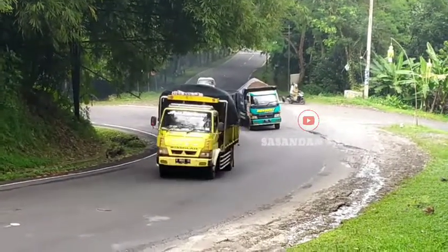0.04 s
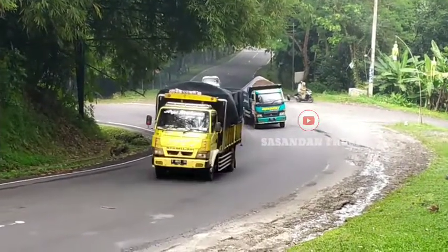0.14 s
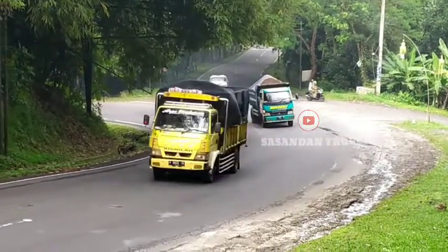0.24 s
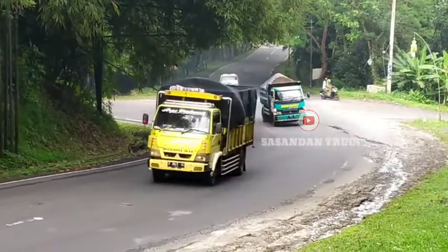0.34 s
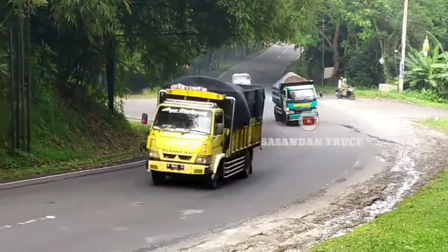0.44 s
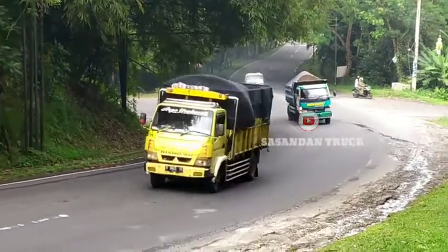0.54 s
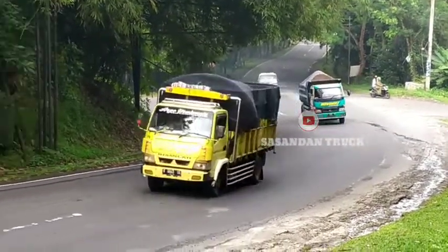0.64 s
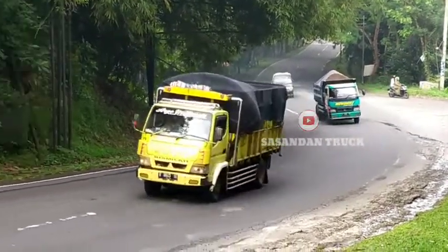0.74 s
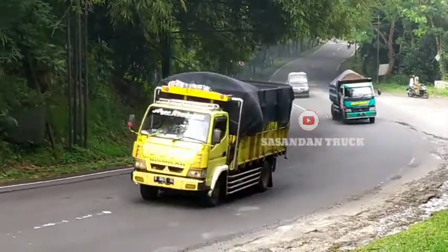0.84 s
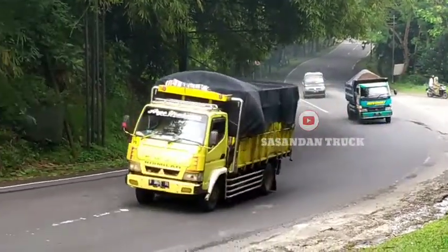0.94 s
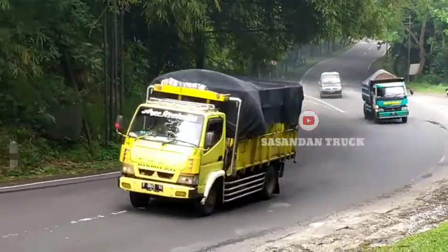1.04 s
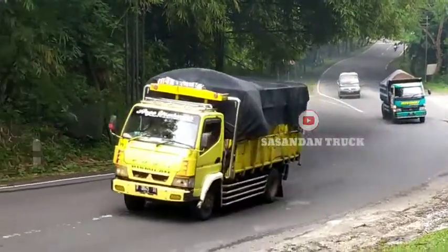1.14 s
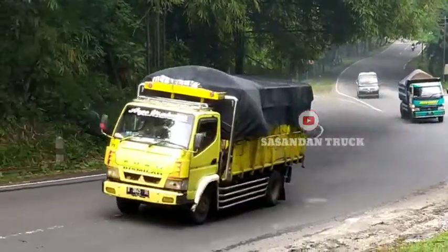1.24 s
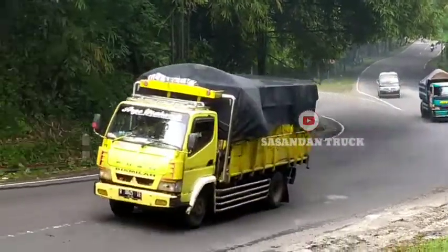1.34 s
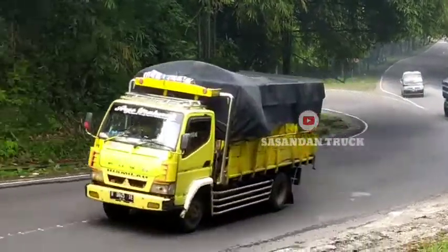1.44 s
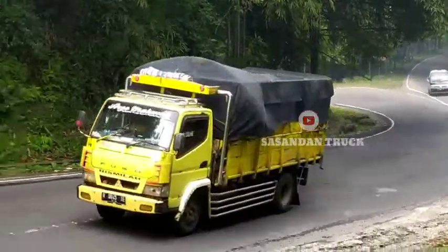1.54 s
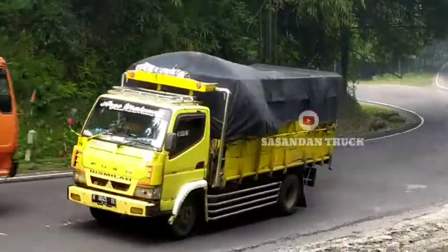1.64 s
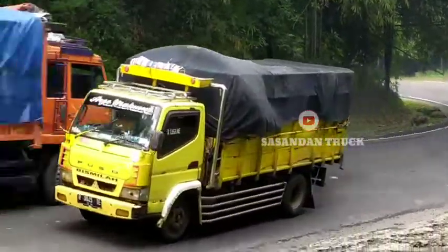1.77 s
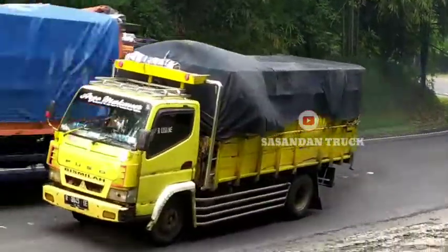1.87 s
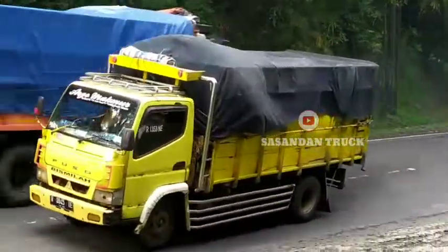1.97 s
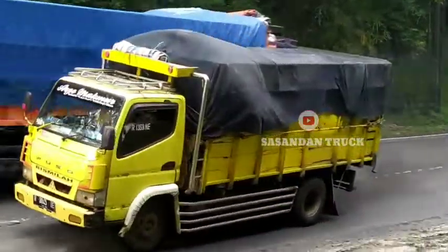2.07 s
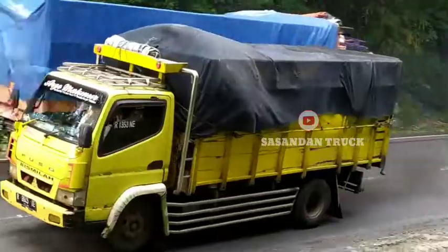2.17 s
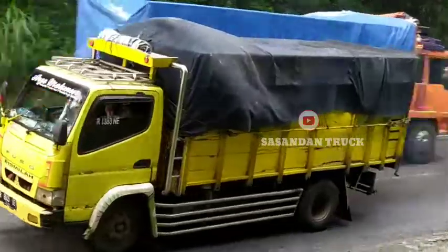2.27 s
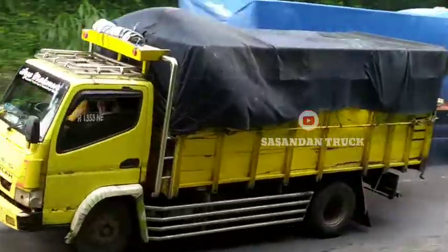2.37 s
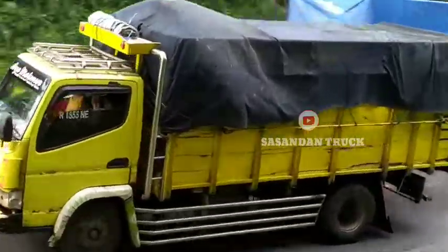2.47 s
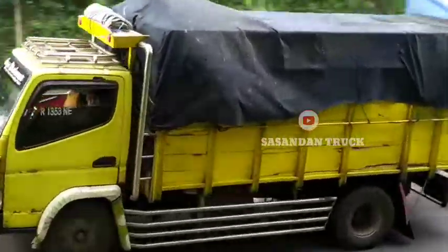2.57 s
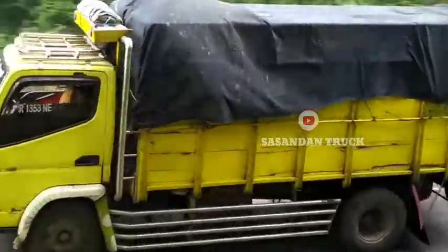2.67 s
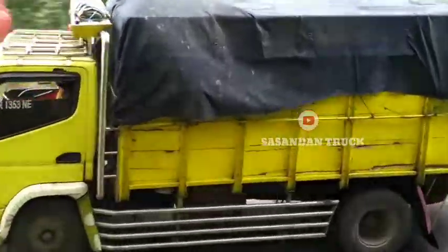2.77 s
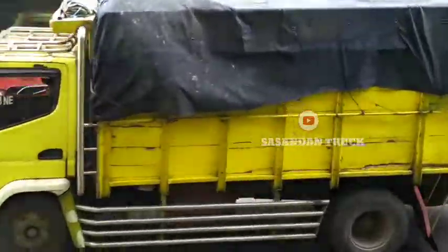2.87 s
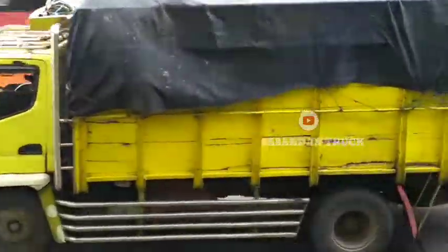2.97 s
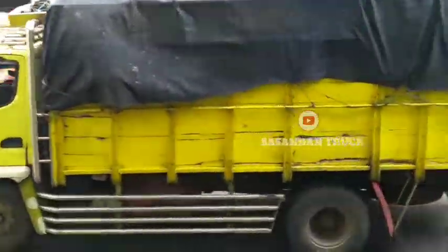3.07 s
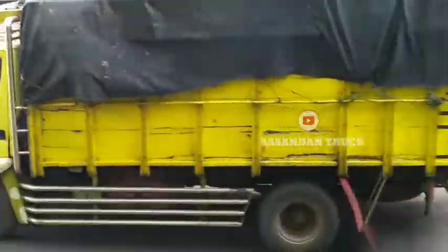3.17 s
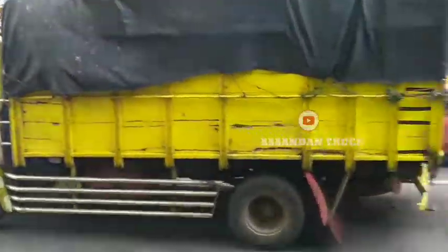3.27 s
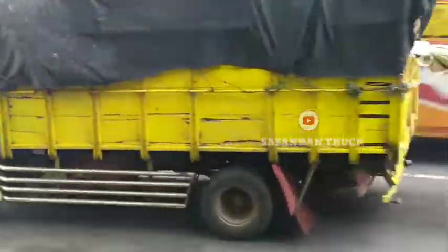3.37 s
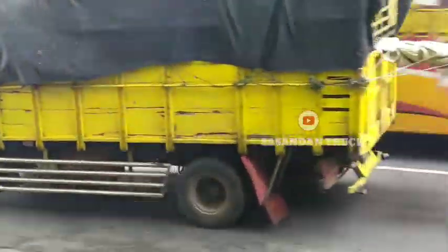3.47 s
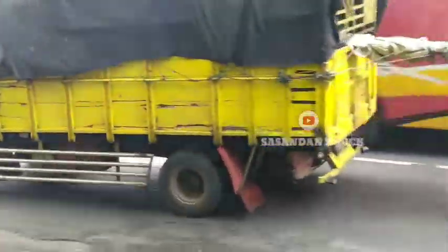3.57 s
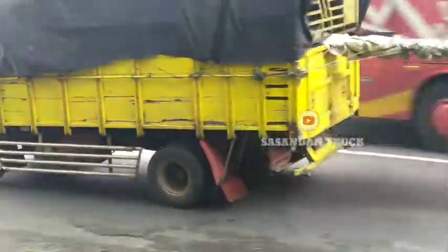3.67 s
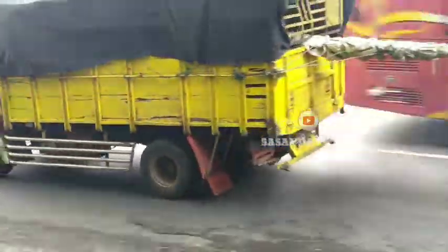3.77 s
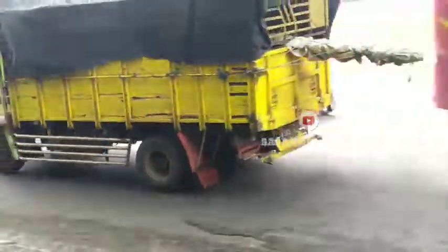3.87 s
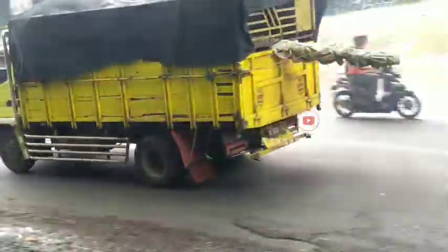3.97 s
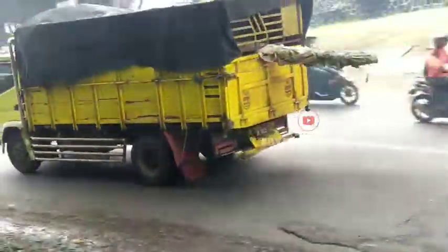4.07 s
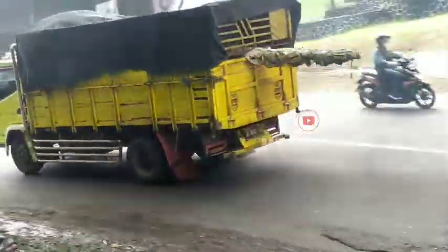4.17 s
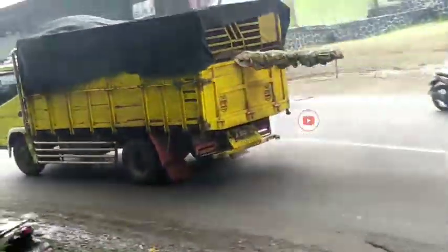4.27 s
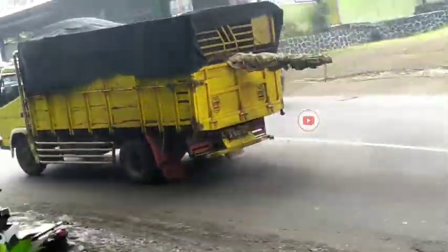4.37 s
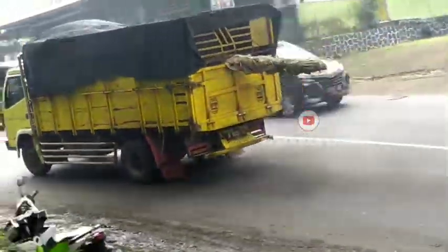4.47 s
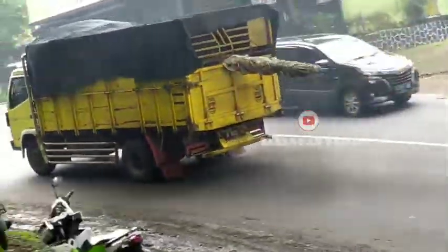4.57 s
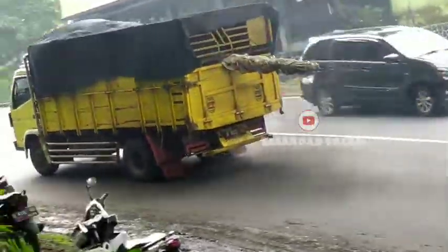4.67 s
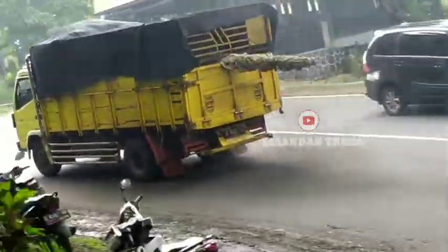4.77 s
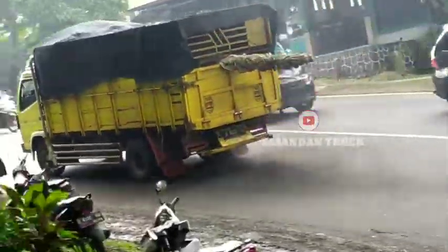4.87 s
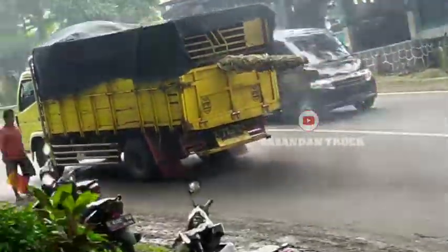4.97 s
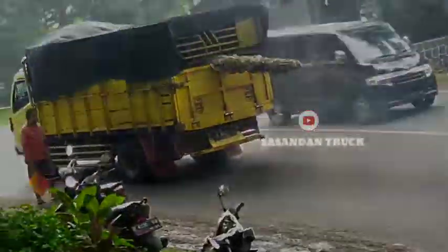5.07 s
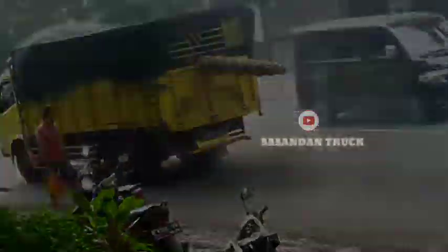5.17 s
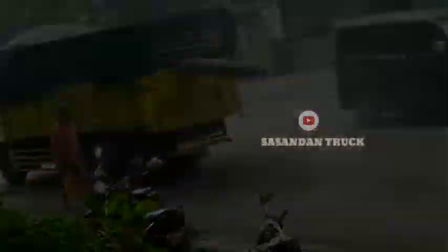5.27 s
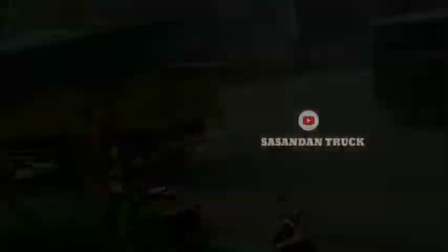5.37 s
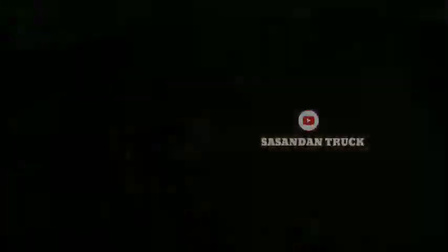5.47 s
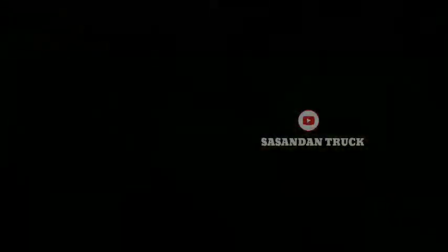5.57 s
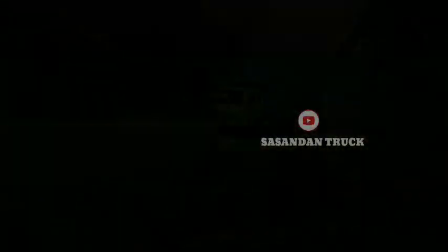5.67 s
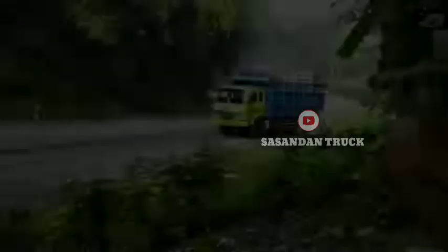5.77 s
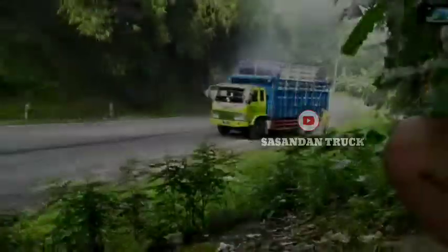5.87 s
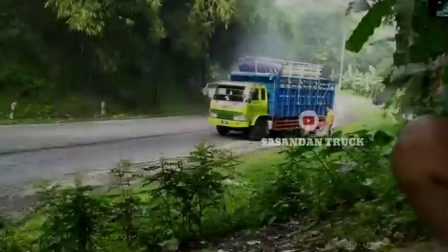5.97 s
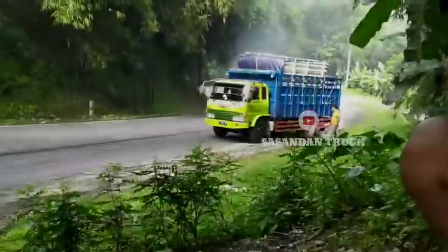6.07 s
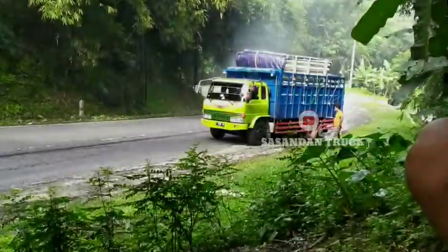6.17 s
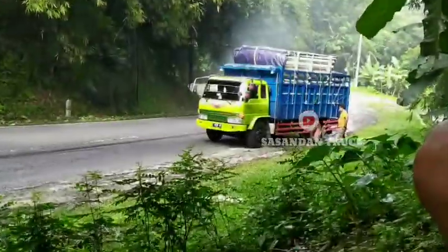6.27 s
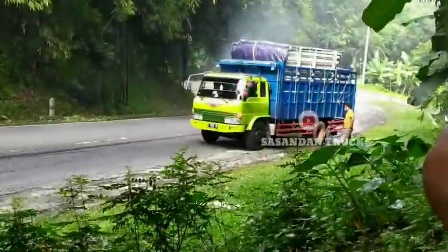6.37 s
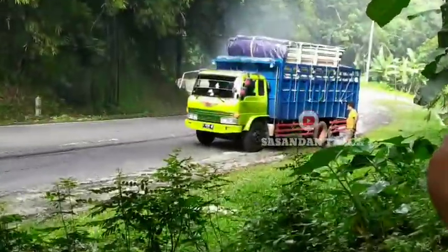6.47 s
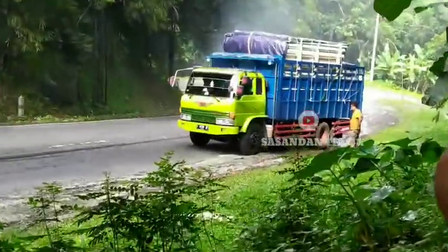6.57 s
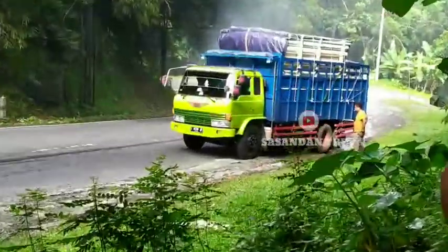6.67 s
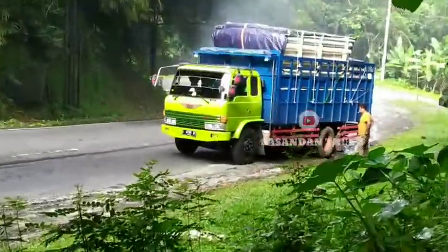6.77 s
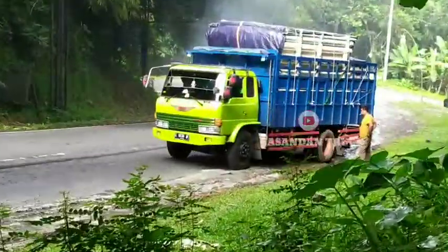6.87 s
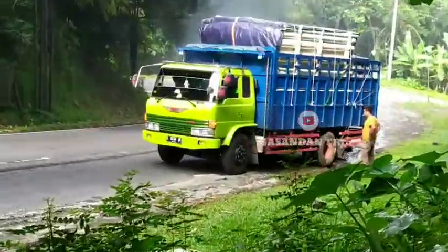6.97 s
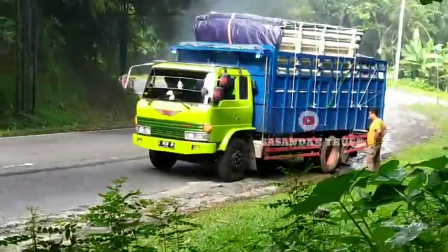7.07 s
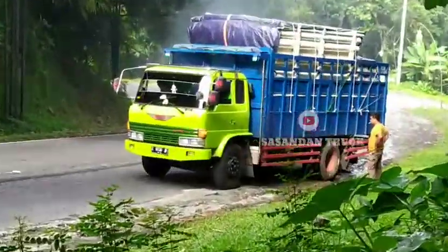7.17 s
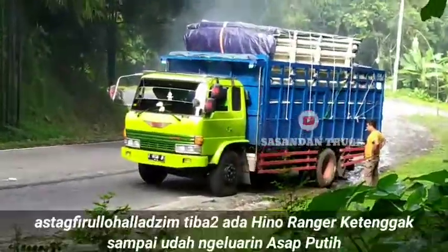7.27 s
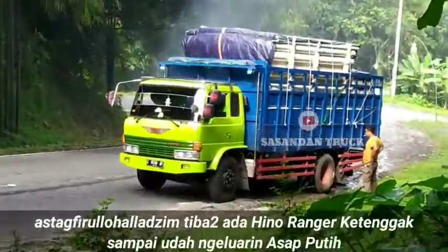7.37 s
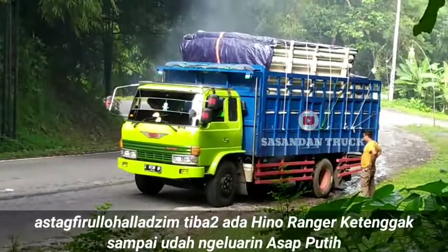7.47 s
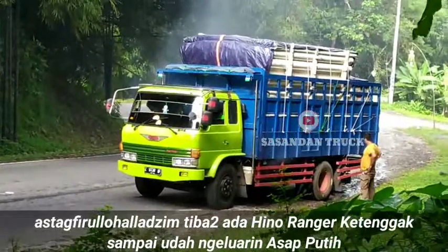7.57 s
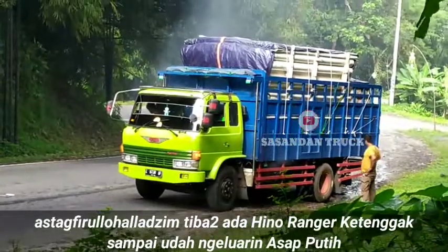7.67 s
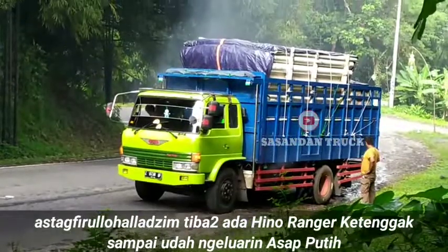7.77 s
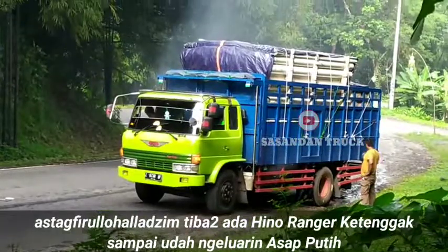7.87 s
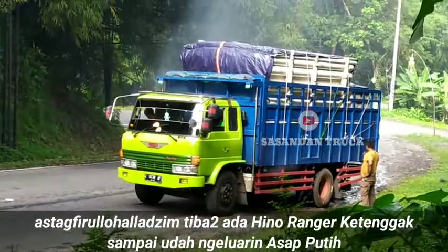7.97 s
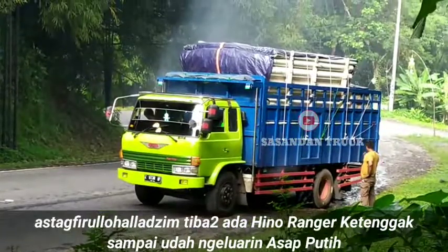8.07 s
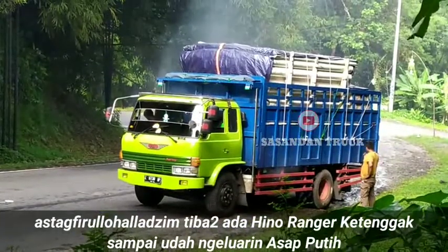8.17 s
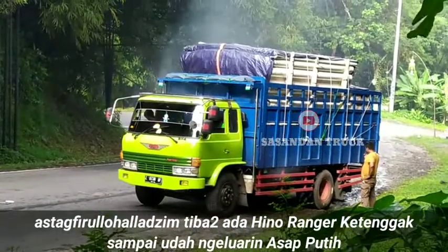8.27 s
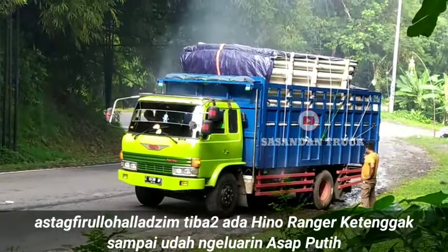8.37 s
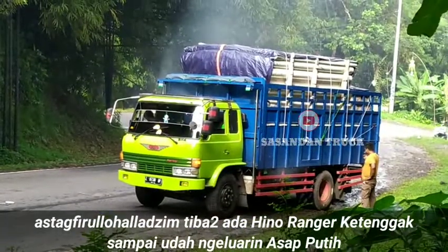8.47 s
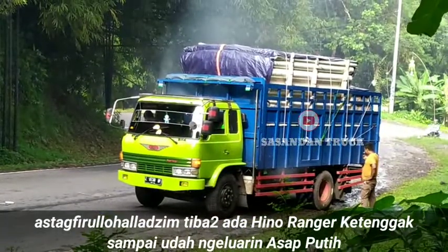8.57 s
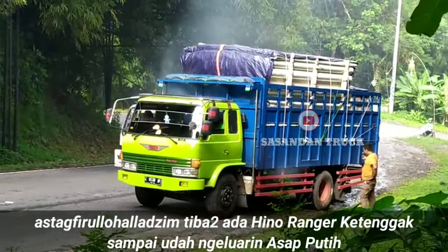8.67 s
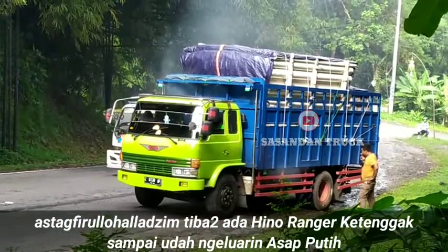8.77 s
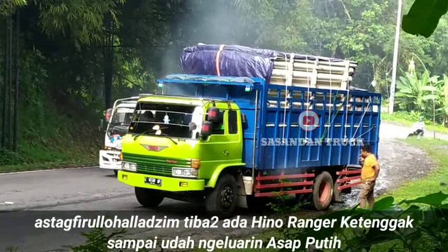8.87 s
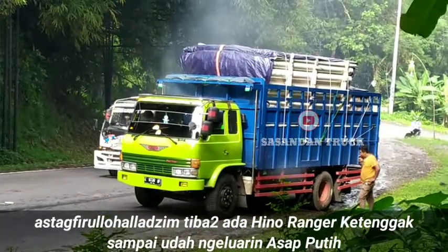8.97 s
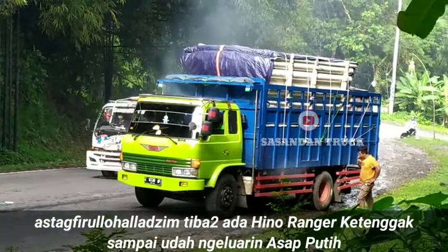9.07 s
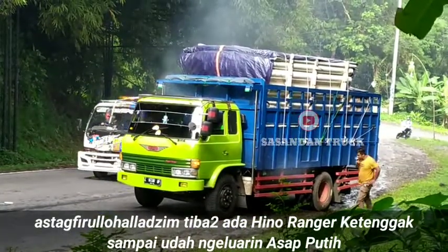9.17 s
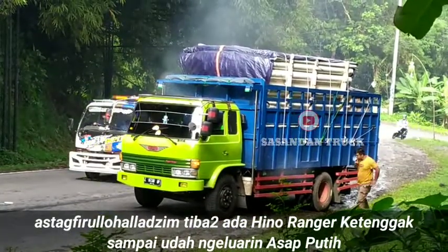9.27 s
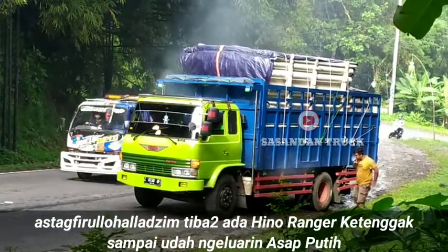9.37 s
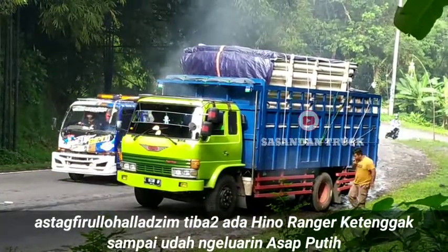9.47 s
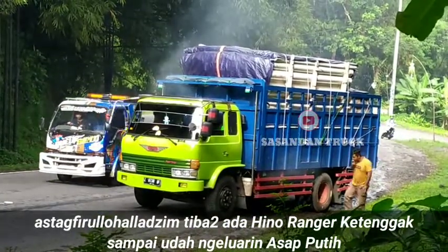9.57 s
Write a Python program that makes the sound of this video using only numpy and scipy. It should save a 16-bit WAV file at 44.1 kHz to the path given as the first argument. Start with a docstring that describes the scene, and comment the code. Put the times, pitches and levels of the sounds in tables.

```python
"""By an uphill road, a loaded four-cylinder diesel truck labours past a pair of microphone ports. Each firing
thumps in the exhaust as harmonics and silencer pops, and its puff blows a shrill tailpipe whistle. Shaped noise
gives engine clatter and the roar of tyres and engine; traffic hums and hiss spurts cross it. Then the scene
changes: a second truck idles further off as pulsed noise under a swelling hum, and a third draws nearer with a
growing gear whine, under bands of hiss and thin tones gliding high above."""
import sys
import numpy as np
from scipy import signal
from scipy.fft import rfft, irfft
from scipy.io import wavfile
from scipy.ndimage import uniform_filter1d, minimum_filter1d

SR = 44100
rng = np.random.default_rng(int(sys.argv[2]) if len(sys.argv) > 2 else 0)


def waveform_to_disk(signal):
    """Save audio, clipped to [-1, 1], as 16-bit WAV at the path in sys.argv[1]."""
    frames = np.transpose(np.atleast_2d(signal))
    scaled = np.clip(frames, -1, 1) * 32767
    samples = np.round(scaled).astype(np.int16)
    wavfile.write(sys.argv[1], SR, samples)


N = 425124
TIME = np.arange(N) / SR
BINS = np.fft.rfftfreq(N, 1 / SR)


def amp(db):
    """Level law: decibels to an amplitude factor."""
    return 10 ** (np.asarray(db) / 20)


def unit(x):
    """Normalisation: scales a signal to rms 1."""
    return x / np.sqrt(np.mean(abs(x) ** 2) + 1e-20)


def spectrum(points):
    """Log-frequency interpolation: a short spectrum spread over all frequencies."""
    hz, value = np.transpose(points)
    return np.interp(np.log(BINS + 1), np.log(hz), value)


def curve(points):
    """Linear interpolation: a short curve in time spread over all samples."""
    return np.interp(TIME, *np.transpose(points))


def bell(s, half):
    """Gaussian envelope: a smooth swell of height 1 around s."""
    return np.exp(-((TIME - s) / half) ** 2 / 2)


def ramp(s, length):
    """Sigmoid transition: a smooth step from 0 to 1 around s."""
    return .5 + .5 * np.tanh((TIME - s) / length)


def pan(db):
    """Interaural level difference: gains of the two ports for a left-right difference."""
    return amp(np.outer([.5, -.5], db))


def colour(x, points):
    """Linear filtering: shapes the noise by a spectrum, to rms 1."""
    return unit(irfft(rfft(x) * amp(spectrum(points)), N))


def wander(hz):
    """Low-passed random process: slow chance of rms 1, up to about hz changes a second."""
    size = 4096
    frequency = np.fft.rfftfreq(size, TIME[-1] / size)
    slow = irfft(rfft(rng.standard_normal(size)) / (1 + (frequency / hz) ** 4))
    return np.interp(TIME, np.linspace(0, TIME[-1], size), unit(slow))


# likeness of left and right noise: (frequency [Hz], correlation [0 to 1])
PORT_LIKENESS = [(60, .995), (150, .975), (300, .91), (550, .84), (1000, .78), (2000, .25), (8000, .05)]


def air(lag_ms):
    """Spatial coherence: turbulent noise alike at both ports in the bass, reaching the left one later."""
    a, b = rfft(rng.standard_normal((2, N)))
    same = np.clip(spectrum(PORT_LIKENESS), 0, 1)
    delay = np.exp(-2j * np.pi * BINS * lag_ms / 10 ** 3)
    left = (same * a + np.sqrt(1 - same ** 2) * b) * delay
    return irfft(np.array([left, a]), N)


def resonate(x, hz, width_hz):
    """Resonance: a steep band-pass that follows hz, to rms 1."""
    turn = np.exp(2j * np.pi * np.cumsum(hz * np.ones(N)) / SR)
    r = np.exp(-np.pi * width_hz / SR)
    # shift the band to zero frequency, smooth it there, then shift it back
    smooth = signal.lfilter([(1 - r) ** 2], [1, -2 * r, r * r], x / turn)
    return unit((turn * smooth).real)


def swells(rows, flow):
    """Band-limited noise: narrow or wide bands that rise and die away."""
    return sum(amp(db) * bell(s, half) * resonate(flow, hz, width)
               for s, half, hz, width, db in rows)


def tone(turns, flutter, flutter_hz):
    """Random modulation: an engine order whose strength and phase flutter."""
    angle = 2 * np.pi * (turns + rng.random())
    in_phase = (1 + flutter * wander(flutter_hz)) * np.cos(angle)
    return unit(in_phase + flutter * wander(flutter_hz) * np.sin(angle))


# strength of each cylinder in firing order [dB]
CYLINDER_DB = [-3.5, -6.5, -4, -5.5]


def puffs(turns, depth, length, uneven_db):
    """Pulsating flow: one gas puff per firing, quick to rise and slower to die, over a steady flow."""
    count = np.floor(turns).astype(int)
    chance = rng.standard_normal(N // 100)[count]
    size = amp(np.take(CYLINDER_DB, count, mode="wrap") + uneven_db * chance)
    age = (turns % 1) / length  # length is a share of the firing interval
    return unit(1 + depth * size * age * np.exp(1 - age))


# the pass: time of the closest point, distance, speed; and the speed of sound
CLOSEST_S, DISTANCE_M, SPEED_M_PER_S, SOUND_M_PER_S = 3.4, 7.794, 6.0, 343


def nearness(s):
    """Pass-by geometry: closest over present distance, for a part of the truck that is nearest at s."""
    return DISTANCE_M / np.hypot(DISTANCE_M, SPEED_M_PER_S * (TIME - s))


def passing(s, db, fall):
    """Spreading and directivity: gain of a passing source; a sideways beam falls faster with distance."""
    return amp(db) * nearness(s) ** fall


def doppler():
    """Doppler effect: pitch factor above 1 on the approach, below 1 going away."""
    receding = SPEED_M_PER_S ** 2 * (TIME - CLOSEST_S) * nearness(CLOSEST_S) / DISTANCE_M
    return 1 / (1 + receding / SOUND_M_PER_S)


# the climb drags the firing rate down until the engine holds
START_HZ, SAG_HZ_PER_S, LABOUR_HZ = 66.0, 3.22, 53.5


def firing_rate():
    """Engine loading: firings per second, sagging under the load, then steady."""
    return np.maximum(START_HZ - SAG_HZ_PER_S * TIME, LABOUR_HZ)


# how far each cylinder fires off the even beat [share of a firing interval]
CYLINDER_STAGGER = [0, .035, -.02, .015]
# pass of the pops: loudest [s], level [dB], fall with distance [exponent]
POP_PASS = (3.6, -31, 1.14)
# colour of the silencer: (frequency [Hz], level per Hz [dB])
SILENCER_SPECTRUM = [(60, -25), (110, -2), (165, 0.5), (260, -7), (340, 1.5), (420, -3), (500, -9),
                     (620, -23), (1200, -60)]


def chug(turns):
    """Impulse response: firing pops ring the silencer; unequal cylinders fill gaps between engine orders."""
    at = np.flatnonzero(np.diff(np.floor(turns)))
    order = np.arange(len(at))
    size, late = rng.standard_normal((len(at), 2)).T
    offset = np.take(CYLINDER_STAGGER, order, mode="wrap") + .004 * late
    at = at + offset * SR / LABOUR_HZ
    pops = np.zeros(N)
    pops[np.clip(at.astype(int), 0, N - 1)] = amp(np.take(CYLINDER_DB, order, mode="wrap") + size)
    return passing(*POP_PASS) * colour(pops, SILENCER_SPECTRUM)


# engine orders that ring out: (peak [s], half length [s], multiple of the firing rate, level [dB])
DRONE_ORDERS = [(.15, .25, 3.87, -40), (2.35, .22, 2, -31.5), (1.55, .35, 6.07, -37.5), (2.15, .35, 3, -35),
                (2.7, .42, 6, -33), (2.65, .25, 4, -37), (3.25, .12, 4, -33), (3.8, .8, 1.5, -32),
                (3.74, .1, 3, -27), (3.22, .22, 7.45, -30), (3.33, .12, 7, -35), (3.72, .12, 7, -35),
                (4.12, .16, 7.47, -28.5), (4.7, .3, 7.43, -37), (3.1, .22, 9, -37.5), (3.72, .1, 9, -34),
                (4.35, .14, 9, -36), (4.55, .25, 6.25, -34)]


def drone(turns):
    """Swept resonance: higher orders ring in turn, wavering, as the sagging speed crosses body resonances."""
    return sum(amp(db) * bell(s, half) * tone(k * turns + .028 * wander(4), flutter=.17, flutter_hz=8)
               for s, half, k, db in DRONE_ORDERS)


# exhaust harmonics 1, 2, 3: (loudest [s], level [dB], fall with distance [exponent])
EXHAUST_HARMONICS = [(3.06, -15, 0.99), (4.1, -25.5, 1.6), (3.55, -25.5, 2.33)]
# brief dips of one harmonic: (time [s], half length [s], harmonic, depth [dB])
HARMONIC_DIPS = [(1.07, 0.14, 1, 13.5), (1.65, 0.19, 1, 3), (2.19, 0.15, 1, 6), (3.57, 0.14, 1, 7),
                 (4.334, 0.06, 1, 6), (5.03, 0.1, 1, 3.5), (6.03, 0.13, 1, 6.5), (2.95, 0.14, 2, 18),
                 (2.85, 0.088, 3, 12), (4.32, 0.25, 3, 11)]
# flutter of the first harmonic (higher ones in proportion), and how fast
FLUTTER, FLUTTER_HZ = .05, 12


def exhaust(turns):
    """Harmonic series: the firing tone and overtones with pops and drone, the same at both ports."""
    thump = np.zeros(N)
    for k, (s, db, fall) in enumerate(EXHAUST_HARMONICS, 1):
        dip_db = sum(depth * bell(at, half)
                     for at, half, harmonic, depth in HARMONIC_DIPS if round(harmonic) == k)
        thump += passing(s, db - dip_db, fall) * tone(k * turns, k * FLUTTER, FLUTTER_HZ)
    return thump + chug(turns) + drone(turns)


# fine panel modes: their unevenness, spacing, and the time from one set facing us to the next
MODE_DEPTH_DB, MODE_SPACING_HZ, FACING_S = 2.2, 45, .8


def facets(x):
    """Modal radiation: many fine panel modes colour the noise; another set faces us as the truck moves."""
    whole, out = rfft(x), 0
    modes = np.arange(0, SR / 2, MODE_SPACING_HZ)
    for k in range(3):
        uneven = amp(MODE_DEPTH_DB * np.interp(BINS, modes, rng.standard_normal(len(modes))))
        away = (TIME / FACING_S - k) % 3 - 1  # three sets take turns
        out = out + irfft(whole * uneven, N) * np.cos(np.pi / 2 * np.minimum(away, 1))
    return unit(out)


# the roar dies away as the tailpipe swings out of line
SWING_S, ROAR_DB_PER_S = 4.5, 1.5


def leaving(db_per_s):
    """Directivity: gain that falls once the tailpipe has swung away."""
    return amp(-db_per_s * np.maximum(TIME - SWING_S, 0))


# roar from the front and from behind, and combustion clatter: (frequency [Hz], level per Hz [dB])
ROAR_FRONT, ROAR_REAR = [(25, -18), (45, 2), (85, 4.5), (270, -10.5), (380, -5), (490, -12), (690, -4),
                         (1050, -8.5), (1400, -13.5), (6000, -40)], [(25, -1.5), (90, 5.5), (200, -4), (400, -1), (560, -11.5), (750, -7),
                                       (1050, -7), (1400, -16), (6000, -64)]
CLATTER_SPECTRUM = [(300, -48), (900, -8), (1400, -3.5), (1900, 1.5), (2500, -0.5), (3500, -4.5),
                    (4200, -12.5), (5000, -7.5), (6800, -9.5), (9300, -20.5), (11000, -14), (13000, -28.5),
                    (15500, -52)]
# low boom that carries far along the road: (frequency [Hz], level per Hz [dB])
BOOM_SPECTRUM = [(90, -27), (150, 3.5), (210, 0), (280, -3.5), (350, -10), (1000, -60)]
# broad resonances of engine and body, heard as each side faces us:
# (peak [s], half length [s], centre [Hz], width [Hz], level [dB])
PANEL_BANDS = [(1.5, 1.0, 694, 170, -38.5), (3.4, 0.82, 910, 200, -34), (.5, 0.76, 2270, 450, -43),
               (2.2, .5, 2360, 330, -35.5), (3.45, .5, 1900, 300, -36.5), (4.5, .4, 2230, 160, -42)]
# left-right balance of the clatter: (time [s], left minus right [dB])
CLATTER_BALANCE = [(0, 5), (.9, -3), (3.3, -3), (4.3, -2.5)]
# pass of each layer: loudest [s], level [dB], fall with distance [exponent]
ROAR_PASS, CLATTER_PASS = (3.19, -22.5, 0.92), (3.39, -23, 1.09)
FIZZ_PASS, BOOM_PASS = (3, -29.5, 1.61), (2.3, -34.5, 0.05)
# the truck turns from showing its front to showing its tail
TURN_S, TURN_LENGTH_S = 2.78, 0.98
# the load body screens the engine once the cab has gone by
SCREEN_S, SCREEN_LENGTH_S, SCREEN_DB = 4.11, 0.13, -2.5


def engine_noise(turns):
    """Amplitude-modulated noise: roar that deepens as the tail turns to us, clatter beating with firings."""
    tail = ramp(TURN_S, TURN_LENGTH_S)
    beat = puffs(turns, depth=.55, length=.18, uneven_db=1.5)
    front = colour(facets(air(lag_ms=0.13) * beat), ROAR_FRONT)
    behind = colour(facets(air(lag_ms=0.12) * beat), ROAR_REAR)
    roar = np.sqrt(1 - tail) * front + np.sqrt(tail) * leaving(ROAR_DB_PER_S) * behind
    knock = puffs(turns, depth=.36, length=.1, uneven_db=3.5)
    clatter = colour(facets(air(lag_ms=.12) * knock), CLATTER_SPECTRUM)
    clatter = clatter * amp(.5 * wander(19.0)) * pan(curve(CLATTER_BALANCE))
    # the finest hiss carries only from close by
    fizz_points = [(2500, -33), (4100, 19.5), (5500, 3.0), (11000, 1.5), (15000, -1.5)]  # (Hz, dB)
    fizz = colour(air(lag_ms=0.17), fizz_points) * amp(1.5 * wander(14))
    screen = amp(SCREEN_DB * ramp(SCREEN_S, SCREEN_LENGTH_S))
    boom = colour(air(lag_ms=0.12) * beat, BOOM_SPECTRUM)
    noise = swells(PANEL_BANDS, air(lag_ms=0.1) * knock)
    noise = noise + passing(*BOOM_PASS) * boom
    noise = noise + passing(*ROAR_PASS) * roar
    noise = noise + screen * passing(*CLATTER_PASS) * clatter
    return noise + passing(*FIZZ_PASS) * fizz


# whistle pitch falling with the gas flow: (time [s], frequency [Hz])
FLOW_PITCH = [(0, 8900), (1.4, 8810), (2, 8720), (2.6, 8540), (3.1, 8346), (3.6, 8230), (4.15, 8060),
              (4.5, 8080), (5.6, 8030)]
# moments when it catches on a purer note: (time [s], half length [s])
PURE_CATCHES = [(1.9, 0.25), (2.55, 0.078), (3.038, 0.15), (3.582, 0.11), (4.35, 0.22)]
# sudden hard chirps: (time [s], half length [s], level [dB])
HARD_CHIRPS = [(3.5735, .0016, -8.5), (4.231, .0016, -11.5)]
# jet hiss as the pipe's mouth points at us: (peak [s], half length [s], centre [Hz], width [Hz], level [dB])
JET_HISS = [(4.9, 0.59, 10360, 1100, -41)]
# left-right balance of the whistle: (time [s], left minus right [dB])
WHISTLE_BALANCE = [(0, -6), (2.65, -10), (3, -3.5), (3.45, -3.5), (3.75, -6), (4.3, 1), (4.8, -2), (5.6, 5)]
# pass of the whistle: loudest [s], level [dB], fall with distance [exponent]
WHISTLE_PASS = (3.43, -14.5, 1.58)
# the pipe's own pitch, and the pitch scatter from puff to puff
WHISTLE_HZ, SCATTER_HZ = 7990, 60
# power share of focused tone, its fall with distance [exponent], and the strength of the purer note
FOCUS, FOCUS_FALL, CATCH_GAIN = 0.94, 0.91, .9


def whistle(turns):
    """Flow-excited resonance: puffs blow a focused tone in a breathy band, falling as the truck goes by."""
    hz = curve(FLOW_PITCH)
    focus = np.clip(FOCUS * nearness(CLOSEST_S) ** FOCUS_FALL, 0, 1)
    blow = puffs(turns + .15, depth=1.7, length=.2, uneven_db=2)
    loose = resonate(air(lag_ms=0.212), hz + SCATTER_HZ * wander(48), width_hz=400)
    locked = resonate(air(lag_ms=0.2085), hz + 45 * wander(18), width_hz=60)
    catch = sum(bell(s, half) for s, half in PURE_CATCHES)
    core = unit(loose + CATCH_GAIN * catch * locked)
    # the tone saturates in the pipe, so its strength follows the puffs
    envelope = abs(signal.hilbert(core))
    core = unit(core / np.sqrt(1 + 0.5 * envelope ** 2)) * blow
    gusts = puffs(turns + .1, depth=.7, length=.2, uneven_db=3)
    # the breath rings both at the pipe's own pitch and at that of the flow
    breathy = unit(sum(resonate(air(lag_ms=0.203) * gusts, centre, width_hz=820)
                       for centre in (hz, WHISTLE_HZ)))
    pipe = [(5500, -40), (6950, 4.5), (7400, 4.0), (8900, 3.0), (9300, -2), (10000, -28)]  # (Hz, dB)
    sound = colour(np.sqrt(focus) * core + np.sqrt(1 - focus) * breathy, pipe)
    sound = sound * amp(0.65 * wander(30) + 0.46 * wander(5.2))
    jet = swells(JET_HISS, air(lag_ms=0.19) * gusts)
    chirp_gain = sum(amp(db) * bell(s, half) for s, half, db in HARD_CHIRPS)
    chirps = chirp_gain * unit(np.sin(2 * np.pi * np.cumsum(hz) / SR))
    return (passing(*WHISTLE_PASS) * sound + chirps) * pan(curve(WHISTLE_BALANCE)) + jet


# hums of other vehicles: (peak [s], half length [s], frequency [Hz], slide [Hz/s], level [dB])
VEHICLE_TONES = [(.8, .7, 83, 0, -33), (1.1, 1.1, 147, -2, -41), (.55, .13, 270, 0, -37),
                 (.7, .15, 294, 0, -38), (.55, .25, 386, 0, -39), (7.4, .17, 610, -70, -56),
                 (8.95, .3, 602, -12, -51.5)]


def traffic_tones():
    """Frequency glide: hums and whines of other vehicles, each swelling, some sliding in pitch."""
    total = 0
    for s, half, hz, slide, db in VEHICLE_TONES:
        turns = np.cumsum(hz + slide * (TIME - s) + 1.2 * wander(8)) / SR
        total = total + amp(db) * bell(s, half) * tone(turns, flutter=.2, flutter_hz=9)
    return total


# hiss and rumble of the far traffic: (peak [s], half length [s], centre [Hz], width [Hz], level [dB])
HISS_BANDS = [(8.02, 0.082, 188, 70, -44), (9, 0.48, 605, 51, -49.5), (10.18, 0.49, 2510, 550, -35),
              (9.7, 2.2, 1170, 57, -54), (7.6, 2, 6050, 240, -58), (7.4, 5.7, 13680, 280, -57),
              (7.4, 5.7, 14200, 520, -52.5)]


def far_hiss():
    """Band-limited noise: hiss and rumble of the far traffic rise and die away."""
    return swells(HISS_BANDS, air(lag_ms=0.14))


# short spurts of hiss: (time [s], half length [s], centre [Hz], width [Hz], level [dB])
HISS_SPURTS = [(3.38, .05, 10500, 6000, -36), (4.725, .03, 5200, 4000, -30.5),
               (4.72, .04, 11000, 6000, -34), (5.0, .04, 2150, 1100, -31), (8.15, .07, 7000, 3200, -47),
               (9.5, .05, 7500, 3000, -51)]


def hiss_spurts():
    """Noise bursts: short spurts of band-limited hiss."""
    return swells(HISS_SPURTS, air(lag_ms=0.04))


# exhaust hum of the far trucks swells: (peak [s], half length [s], level [dB])
FAR_HUM = [(6.3, 0.21, -42), (6.949, 0.41, -37), (8.0, .08, -39.5), (9.05, 0.33, -37.5)]
# overtones of the hum: (multiple of the hum pitch, level [dB])
FAR_OVERTONES = [(1.47, -54.5), (2, -50.5), (3, -47.5)]
# the sixth order of the far engine sings throughout: (time [s], level [dB])
SIXTH_ORDER = [(5.8, -56), (6.55, -53), (6.95, -46.5), (7.3, -53), (8.0, -58), (8.27, -47.5), (8.93, -50),
               (9.17, -46), (9.64, -56)]
# rumble and clatter of the idling truck: (frequency [Hz], level per Hz [dB])
TICKOVER_RUMBLE, TICKOVER_CLATTER = [(25, -32), (42, -17), (55, 2), (90, -1.5), (150, -3), (220, -4.5),
                                     (290, -13.5), (500, -23), (1500, -33.5)], [(150, 3), (350, -2), (650, 0), (1000, -3),
                                                          (1300, -1), (1650, -4), (2450, -2.5),
                                                          (3400, -10.5), (5300, -14), (6100, -12.5),
                                                          (7500, -14), (10000, -19.5), (12800, -27),
                                                          (15000, -29)]
# pitch and overtones arch as the driver eases on and off the throttle
HUM_TOP_HZ, HUM_TOP_S, HUM_DROOP_HZ_PER_S2, HUM_SPREAD_S = 75.3, 7.75, 1.3, 1.4
# left-right balance of the idling clatter, and the rate of the uneven throb
TICKOVER_PAN_DB, THROB_HZ = 0, 17
# levels at NEARING_S and their change: the rumble sinks slightly, the clatter grows
NEARING_S = 8
RUMBLE_DB, RUMBLE_DB_PER_S, TICKOVER_DB, TICKOVER_DB_PER_S = -41, -0.8, -37, 2


def far_trucks():
    """Pulsed noise and harmonics: a diesel ticks over under the swelling hum of traffic."""
    hz = HUM_TOP_HZ - HUM_DROOP_HZ_PER_S2 * np.minimum(abs(TIME - HUM_TOP_S), 2) ** 2
    turns = np.cumsum(hz * (1 + 0.002 * wander(5.5))) / SR
    hum_gain = sum(amp(db) * bell(s, half) for s, half, db in FAR_HUM)
    hum = hum_gain * tone(turns, flutter=0.45, flutter_hz=16)
    overtones = sum(amp(db) * tone(k * turns, flutter=0.3, flutter_hz=3.9) for k, db in FAR_OVERTONES)
    overtones = overtones * bell(HUM_TOP_S, HUM_SPREAD_S)
    sing = amp(curve(SIXTH_ORDER)) * tone(6 * turns, flutter=.2, flutter_hz=9)
    throb_turns = np.cumsum(THROB_HZ * (1 + .07 * wander(5))) / SR
    throb = puffs(throb_turns, depth=.9, length=.2, uneven_db=3)
    since = TIME - NEARING_S
    rumble = colour(air(lag_ms=0.16) * throb, TICKOVER_RUMBLE)
    rumble = rumble * amp(RUMBLE_DB + RUMBLE_DB_PER_S * since)
    clatter = colour(air(lag_ms=0.25), TICKOVER_CLATTER)
    clatter = clatter * amp(TICKOVER_DB + TICKOVER_DB_PER_S * since + .5 * wander(20))
    return hum + overtones + sing + rumble + clatter * pan(TICKOVER_PAN_DB)


# thin gliding tones: (start [s], frequency [Hz], slide [Hz/s])
THIN_GLIDES = [(5.7, 14800, -60), (7.2, 14720, -290)]


def glide(start, hz, hz_per_s):
    """Linear frequency sweep: a faint, very high tone that slides slowly."""
    turns = np.cumsum(hz + hz_per_s * (TIME - start) + 8 * wander(30)) / SR
    return amp(-63) * ramp(start, .1) * np.sin(2 * np.pi * turns)


# level of each harmonic of the oncoming exhaust [dB]
ONCOMING_EXHAUST_DB = [-45, -47.5, -52, -62]
ONCOMING_WHINE_HZ, ONCOMING_FIRING_HZ = 1326, 54
# it comes out from behind the idling truck, and its whine grows from this level at NEARING_S
EMERGE_S, EMERGE_LENGTH_S, ONCOMING_WHINE_DB, WHINE_DB_PER_S = 8.6, .15, -72.5, 19.5
# the whine that carries before the oncoming truck shows
FAINT_WHINE_DB = -60


def oncoming_truck():
    """Acoustic screening: a low exhaust note and a growing, rough whine emerge from behind the idling truck."""
    hz = ONCOMING_WHINE_HZ + 5 * wander(14)
    pure = tone(np.cumsum(hz) / SR, flutter=.2, flutter_hz=30)
    rough = resonate(air(lag_ms=.25), hz, width_hz=70)
    gears = .87 * pure + .5 * rough
    whine = amp(ONCOMING_WHINE_DB + WHINE_DB_PER_S * (TIME - NEARING_S)) * gears
    firing = sum(amp(db) * tone(k * ONCOMING_FIRING_HZ * TIME, flutter=0.7, flutter_hz=6.2)
                 for k, db in enumerate(ONCOMING_EXHAUST_DB, 1))
    return ramp(EMERGE_S, EMERGE_LENGTH_S) * (whine + firing) + amp(FAINT_WHINE_DB) * gears


# the scene changes: the near truck crossfades into the far traffic
FADE_END_S, FADE_LENGTH_S, FADE_POWER = 6.604, 1.64, 1.22


def scene():
    """Superposition: all sources add at the two ports; the scene changes from the near truck to the far
    traffic."""
    turns = np.cumsum(firing_rate() * doppler() * (1 + 0.0023 * wander(6.6))) / SR
    truck = exhaust(turns) + engine_noise(turns) + whistle(turns)
    far = far_hiss() + far_trucks() + sum(glide(*row) for row in THIN_GLIDES) + oncoming_truck()
    fade = np.clip((FADE_END_S - TIME) / FADE_LENGTH_S, 0, 1)
    return fade ** FADE_POWER * truck + (1 - fade) * far + traffic_tones() + hiss_spurts()


# difference in colour of the two ports: (frequency [Hz], left minus right [dB])
PORT_TILT = [(60, 1.26), (250, 1), (500, 0.5), (1200, 2.5), (2500, 6.5), (5000, 1.8), (8300, 4.5),
             (12000, 1.9)]
# bass roll-off of the ports, and the upper band limit
LOW_CUT_HZ, EDGE_HZ = 37.5, 15400


def record(dry):
    """Transducer response: ports shed the lowest bass and differ in colour; limiter, then band limit."""
    low_cut = 1 / np.sqrt(1 + (LOW_CUT_HZ / (BINS + 1)) ** 10)
    heard = irfft(rfft(dry) * low_cut * pan(spectrum(PORT_TILT)), N)
    # a quick limiter holds the peaks, with one gain for both ports
    safe = .87 / np.maximum(abs(heard).max(0), .87)
    heard = heard * uniform_filter1d(minimum_filter1d(safe, size=201), size=201)
    band_limit = signal.firwin(511, EDGE_HZ, window=("kaiser", 9), fs=SR)
    return signal.oaconvolve(heard, band_limit[None], "same")


dry = scene()
out = record(dry)
waveform_to_disk(out)
```